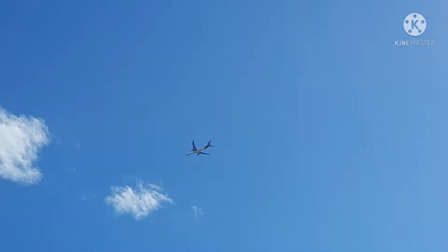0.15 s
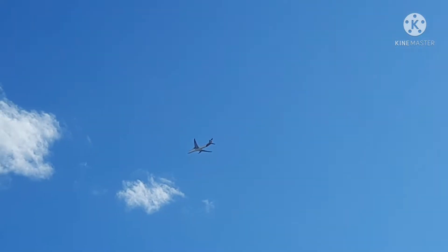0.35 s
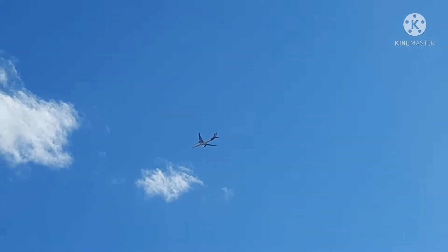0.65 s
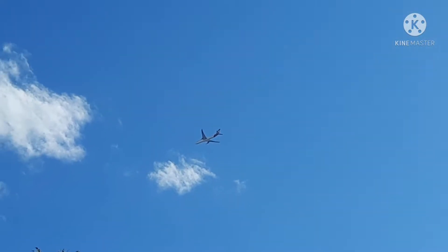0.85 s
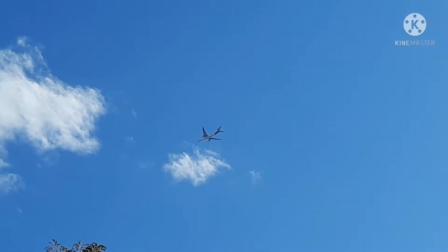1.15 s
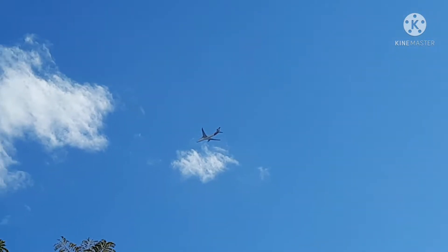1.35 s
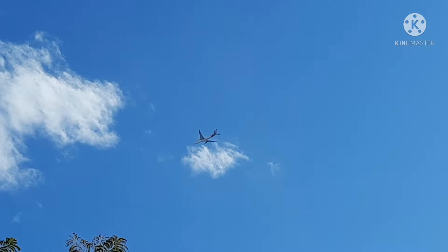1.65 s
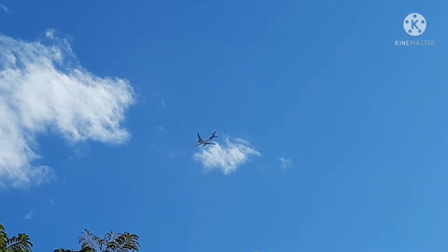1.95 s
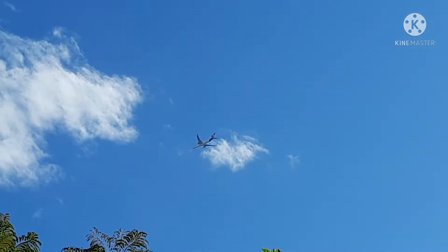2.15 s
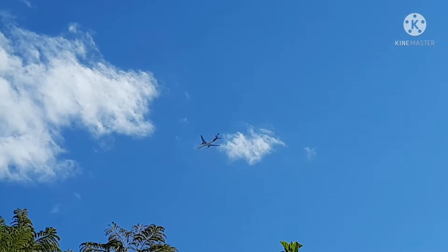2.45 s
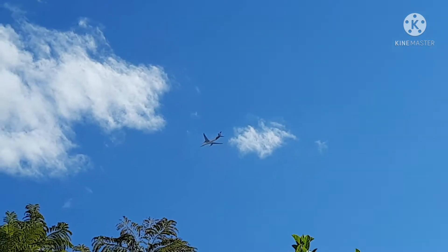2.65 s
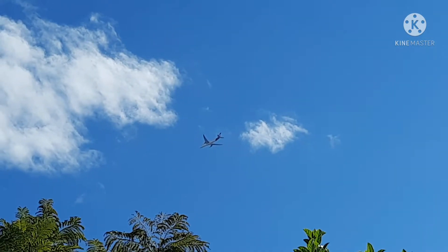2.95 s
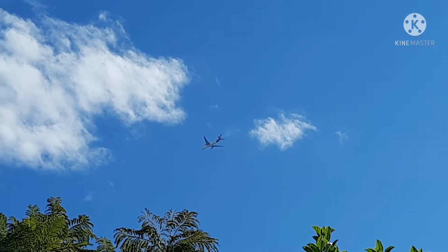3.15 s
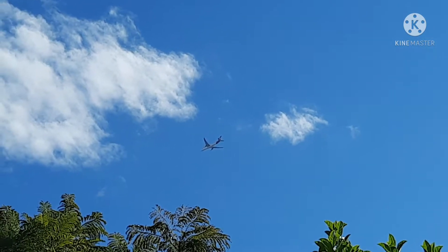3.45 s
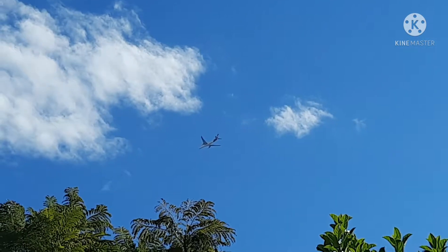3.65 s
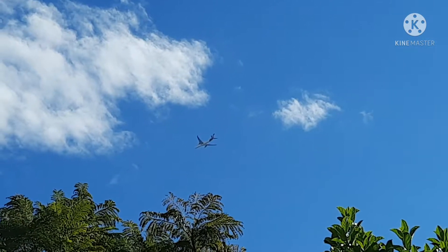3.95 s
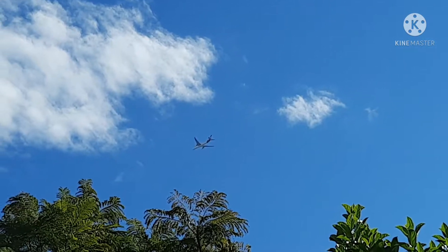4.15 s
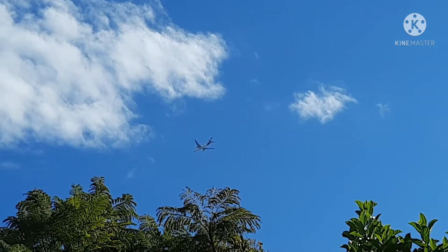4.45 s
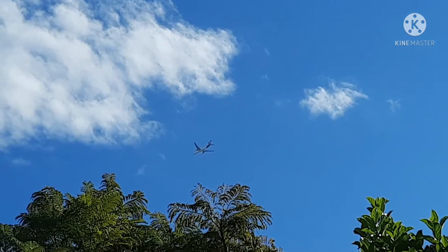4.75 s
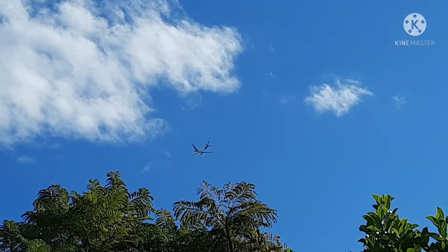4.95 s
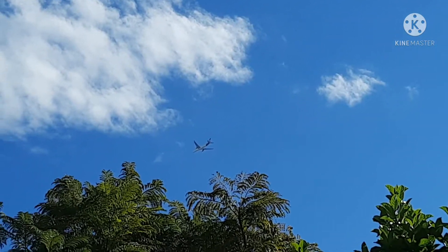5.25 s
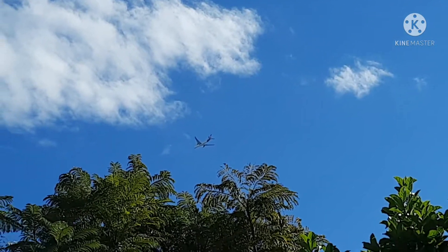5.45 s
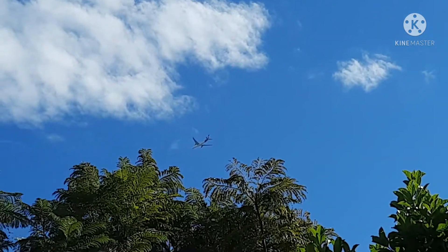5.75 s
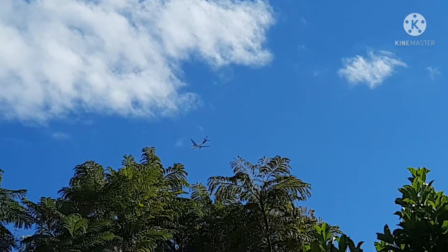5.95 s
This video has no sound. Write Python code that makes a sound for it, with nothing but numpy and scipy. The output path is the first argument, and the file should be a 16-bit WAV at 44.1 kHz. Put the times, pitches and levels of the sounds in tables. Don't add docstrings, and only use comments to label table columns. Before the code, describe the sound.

A jet airliner climbs away high overhead, its deep rumbling roar wavering in strength, with a faint sinking whine and barely audible bird chirps.

```python
import sys
import numpy as np
from scipy import signal
from scipy.fft import rfft, irfft, next_fast_len
from scipy.io import wavfile
from scipy.ndimage import uniform_filter1d, minimum_filter1d

SR = 44100
rng = np.random.default_rng(int(sys.argv[2]) if len(sys.argv) > 2 else 0)


def boost(x):
    u = np.asarray(x, float) / 20
    return 10 ** u


def dump_mix(stems):
    frames = np.atleast_2d(stems).T
    limited = np.clip(frames, -1, 1)
    pcm = np.round(limited * 32767).astype(np.int16)
    wavfile.write(sys.argv[1], SR, pcm)


N = 269539
TIME = np.arange(N) / SR
SIZE = next_fast_len(N)
HZ = np.maximum(np.arange(SIZE // 2 + 1) * SR / SIZE, 1)

# centre in seconds, half length in seconds, gain in dB.
EDDIES = [(-0.17, 0.14, 13.5), (0.59, 0.16, 5.5), (1.36, 0.35, -4), (1.77, 0.11, 8), (2.37, 0.11, -4),
          (2.81, 0.199, 3.5), (3.27, 0.08, 10), (3.63, 0.15, -5), (3.89, 0.42, 1.5), (4.59, 0.067, 2.5),
          (4.93, 0.096, -3.0), (5.45, 0.12, 4.5), (5.86, 0.09, -2)]


def set_rms(x, db):
    return x * boost(db) / np.sqrt(np.mean(x ** 2))


def on_hz(table):
    hz, value = np.transpose(table)
    return np.interp(np.log(HZ), np.log(np.maximum(hz, 1)), value)


def on_time(table):
    seconds, *columns = np.transpose(table)
    return [np.interp(TIME, seconds, column) for column in columns]


def walk(rate):
    hold = int(SR / rate)
    steps = np.repeat(rng.standard_normal(N // hold + 1), hold)
    return 1.3 * uniform_filter1d(uniform_filter1d(steps, hold), hold)[:N]


def passing(table, share=1):
    centre_s, half_s, db = np.transpose(table)[:3]
    coarse = TIME[::128]
    bells = np.exp(-.5 * ((coarse[:, None] - centre_s) / half_s) ** 2)
    return np.interp(TIME, coarse, bells @ (share * db))


def noise():
    return rfft(rng.standard_normal(SIZE))


def tone(hz, db):
    return np.sqrt(2) * boost(db) * np.sin(2 * np.pi * np.cumsum(hz) / SR)


def ports(direct, scattered):
    # frequency in Hz, left minus right in dB.
    port_db = [(60, 0.0), (91, 0.07), (140, 0.0), (210, 0.5), (320, 0.5), (490, 1.45), (740, 2.88),
               (1130, 2.88), (1710, 2.34), (2600, -4.5)]
    # frequency in Hz, lead of the left port in radians.
    port_phase = [(60, -.02), (300, -.1), (600, -.3), (850, -.75), (1050, -.4), (1300, -1.85),
                  (1500, -1.45), (2000, -2.3), (2250, -2.2), (2550, -1.0), (2900, -1.6)]
    # frequency in Hz, likeness of the ports from 0 to 1.
    port_alike = [(40, .99), (90, .997), (180, .99), (350, .96), (600, .92), (900, .75), (1100, .62),
                  (1350, .86), (1800, .88), (2300, .55), (2600, .6), (3000, .3)]
    half = boost(on_hz(port_db) / 2) * np.exp(.5j * on_hz(port_phase))
    alike = np.clip(on_hz(port_alike), 0, 1)
    common = np.sqrt((1 + alike) / 2) * direct
    apart = np.sqrt((1 - alike) / 2) * scattered
    return np.array([(common + apart) * half, (common - apart) / half])


def roar():
    # frequency in Hz, density in dB per Hz.
    jet_spectrum = [(15, -48), (30, -35.5), (45, -19.5), (65, -2), (150, -1.5), (330, -1.5), (480, -1),
                    (620, -6.5), (800, -13.5), (1100, -20.5), (1500, -24), (1900, -30), (2500, -50),
                    (2900, -66), (3300, -82.5)]
    # delay in milliseconds, share of the pressure.
    echoes = [(2.56, -0.026), (3.32, -0.011), (4.65, -0.073), (6.4, 0.21), (7.51, -0.14), (10.24, -0.1),
              (12.13, 0.17), (13.24, -0.13), (15.15, 0.18), (16.78, -0.17), (17.88, -0.17), (20.03, 0.021),
              (21.47, 0.17), (30.07, 0.24)]
    # centre in seconds, half length in seconds, gain in dB, frequency in Hz.
    wisps = [(0.04, 0.13, -1.5, 471), (0.165, 0.1, 6.0, 120.8), (0.45, 0.06, 4, 2400), (0.5, 0.06, 4, 110),
             (0.57, 0.09, 4, 420), (1.004, 0.28, -3, 168.9), (1.039, 0.052, 7.5, 80.2),
             (1.056, 0.18, -2, 470), (1.06, 0.2, 2.0, 1120), (1.2, 0.08, 3, 270), (1.78, 0.09, -7.5, 169),
             (1.839, 0.3, 2.5, 2660), (2.2, 0.07, 4, 2205), (2.418, 0.09, 2, 70), (2.601, 0.06, 3.5, 200),
             (2.662, 0.06, 4.5, 2673), (2.778, 0.12, -3.5, 1342), (2.858, 0.06, 4, 572),
             (3.2, 0.1, -3, 560), (3.25, 0.07, 5, 2794), (3.7, 0.1, 3.5, 200), (4.117, 0.3, 2.0, 464),
             (4.157, 0.06, -5.5, 1126), (4.498, 0.078, -5, 2690), (5.078, 0.06, 4, 170),
             (5.249, 0.076, 4.5, 467), (5.36, 0.13, -2, 100.3), (5.496, 0.097, 6, 1880),
             (5.54, 0.13, -2.5, 327.5), (5.904, 0.16, 5.5, 171.4)]
    wisp_octaves = 0.34
    full_focus_hz, focus_law = 900, 0.95
    echo_dull_hz = 700
    flicker_db, flicker_rate = 0.94, 9

    reflected = sum(share * np.exp(-2j * np.pi * HZ * ms / 1000) for ms, share in echoes)
    walls = 1 + reflected / (1 + 1j * HZ / echo_dull_hz)
    both = ports(noise(), noise()) * boost(on_hz(jet_spectrum)) * walls
    focus_db = passing(EDDIES)
    wisp_hz = np.transpose(wisps)[3]
    centres = np.log(30) + np.arange(15) * np.log(2) / 2
    out = 0
    for k, centre in enumerate(centres):
        band = np.interp(np.log(HZ), centres, np.arange(len(centres)) == k)
        felt = min(np.exp(centre) / full_focus_hz, 1) ** focus_law
        near = np.exp(-.5 * (np.log2(np.exp(centre) / wisp_hz) / wisp_octaves) ** 2)
        swell_db = felt * focus_db + passing(wisps, near) + flicker_db * walk(flicker_rate)
        out = out + irfft(both * band, SIZE)[:, :N] * boost(swell_db)
    return set_rms(out, -16)


def whine():
    # centre in seconds, half length in seconds, gain in dB.
    fan_glints = [(0.34, 0.0337, 4), (0.55, 0.028, 2), (0.71, 0.071, 6.0), (1.08, 0.054, 5.5),
                  (1.28, 0.034, 13.5), (1.54, 0.11, 7.5), (1.75, 0.036, 9.5), (1.88, 0.064, 8),
                  (2.11, 0.108, 16), (2.49, 0.164, 14), (3.04, 0.23, 4.5), (3.27, 0.052, 13.5),
                  (3.56, 0.045, 10.5), (3.72, 0.053, 12.0), (4.09, 0.108, 11.5), (4.36, 0.12, 11),
                  (4.69, 0.088, 3.0), (4.99, 0.15, 7), (5.43, 0.15, 8), (5.65, 0.08, 7), (5.87, 0.035, -13),
                  (5.92, 0.114, 15)]
    # centre in seconds, half length in seconds, gain in dB.
    turbine_glints = [
        (.45, 0.075, 12),
        (.8, .05, 9.6),
        (2.13, 0.085, 16),
        (2.45, 0.064, 19),
        (2.83, 0.083, 18),
        (3.1, .15, 8),
        (3.95, .07, 9.8),
    ]
    fan_hz = 1742 - 20.25 * TIME + .408 * TIME ** 2
    turbine_hz = .65 * fan_hz
    focus_db = passing(EDDIES)
    fan_db = -50.5 + focus_db + passing(fan_glints)
    turbine_db = -58 + focus_db + passing(turbine_glints)

    def heard():
        fan = tone(fan_hz + 2.5 * walk(30), fan_db + 1.3 * walk(30))
        turbine = tone(turbine_hz + 3.2 * walk(20), turbine_db)
        return rfft(fan + turbine, SIZE)

    return irfft(ports(heard(), heard()), SIZE)[:, :N]


def among_trees(call, swell_s, t60_s, density=700):
    s = np.arange(SR // 2) / SR
    shape = np.minimum(.3 + s / swell_s, 1.3) * boost(-60 * np.maximum(s - swell_s, 0) / t60_s)
    struck = rng.random((2, len(s))) < density / SR
    copies = struck * rng.standard_normal((2, len(s))) * shape * .7
    copies[:, 0] = 1.0
    return np.array([signal.fftconvolve(call, c)[:N] for c in copies])


def chirps():
    # time from its start in seconds, frequency in Hz, level in dB.
    chirp = [(0, 8200, -20), (.01, 7600, -11), (.018, 7220, -3), (.026, 6850, -3), (.035, 6480, 0),
             (.045, 6370, 0), (.058, 6400, -2), (.064, 6320, -30)]
    # start in seconds, level in dB, left minus right in dB, echo swell in seconds, echo t60 in seconds.
    calls = [
        (1.92, -72, -4, .05, .3),
        (4.378, -71, -4, .05, .5),
        (6.056, -72, -3, .04, .4),
    ]
    out = 0
    for start, db, pan_db, swell_s, t60_s in calls:
        hz, shape_db = on_time([(start + t, f, d) for t, f, d in chirp])
        sounding = (TIME >= start) * (TIME < start + chirp[-1][0])
        call = tone(hz + 80 * walk(330), db + shape_db) * sounding
        out = out + among_trees(call, swell_s, t60_s) * boost(np.array([[pan_db], [-pan_db]]) / 2)
    return out


def whistles():
    # time in seconds, frequency in Hz, level in dB.
    curves = [
        [(1.52, 2790, -85), (1.54, 2740, -68), (1.62, 2480, -66), (1.7, 2250, -65), (1.73, 2180, -85)],
        [(4.872, 3100, -90), (4.887, 3140, -72), (4.902, 3050, -69), (4.92, 2680, -68), (4.99, 2760, -71),
         (5.03, 2660, -72), (5.06, 2580, -77), (5.1, 2540, -90)],
    ]
    out = 0
    for curve in curves:
        hz, db = on_time(curve)
        sounding = (TIME > curve[0][0]) * (TIME < curve[-1][0])
        call = tone(hz + 15 * walk(100), db - 2 + 2.0 * walk(70)) * sounding
        out = out + among_trees(call, .005, .1, density=100) * boost(np.array([[-6.], [2.]]))
    return out


def twig():
    # start in seconds, level in dB, frequency in Hz.
    snaps = [
        (1.858, -67, 7740),
    ]
    out = 0
    for start, db, hz in snaps:
        decay = np.exp(-np.maximum(TIME - start, 0) / .004)
        burst = rng.standard_normal((2, N)) * (TIME >= start) * decay
        band = signal.butter(2, [hz * 0.73, hz * 1.15], "band", fs=SR, output="sos")
        out = out + boost(db + 9.0) * signal.sosfilt(band, burst)
    return out


def far_echo():
    # frequency in Hz, density in dB per Hz.
    far_spectrum = [(400, -20), (800, -1.5), (1300, -10.5), (1800, -18), (2500, -36), (3000, -57)]
    both = np.array([noise(), noise()]) * boost(on_hz(far_spectrum))
    return set_rms(irfft(both, SIZE)[:, :N], -46)


def hiss():
    # frequency in Hz, density in dB per Hz.
    hiss_spectrum = [(300, 3.5), (3000, 2), (4000, 0.5), (5200, -1), (7000, -2.5), (8800, -5.5),
                     (9500, -7.5), (10400, -4.5), (11000, -1), (15500, -4.5)]
    both = irfft(np.array([noise(), noise()]) * boost(on_hz(hiss_spectrum)), SIZE)[:, :N]
    return set_rms(both, -68.5) * boost(np.array([[1.2], [-1.2]]))


def scene():
    return roar() + whine() + chirps() + whistles() + twig() + far_echo() + hiss()


def roll_off(x):
    return signal.sosfilt(signal.butter(12, 15490, fs=SR, output="sos"), x)


def record(dry):
    room = np.minimum(1, .86 / np.maximum(np.abs(dry).max(axis=0), 1e-9))
    lowest = minimum_filter1d(room, size=800)
    gain = uniform_filter1d(uniform_filter1d(lowest, size=400), size=400)
    return roll_off(dry * gain)


dry = scene()
out = record(dry)
dump_mix(out)
```